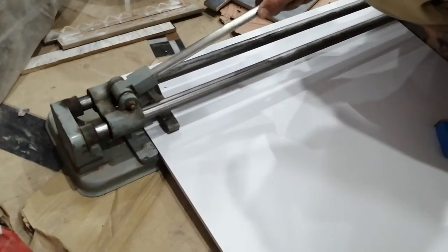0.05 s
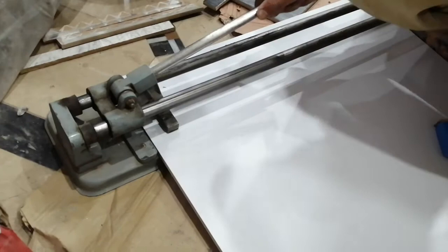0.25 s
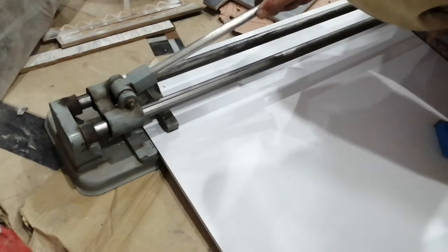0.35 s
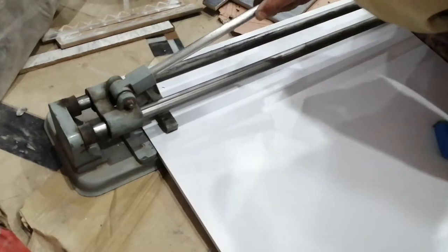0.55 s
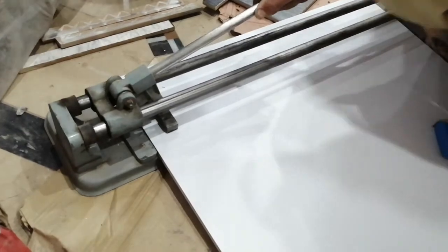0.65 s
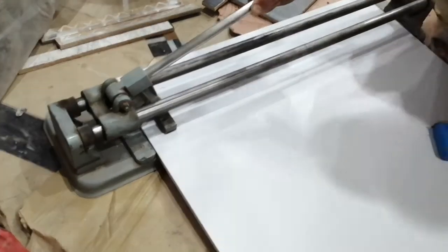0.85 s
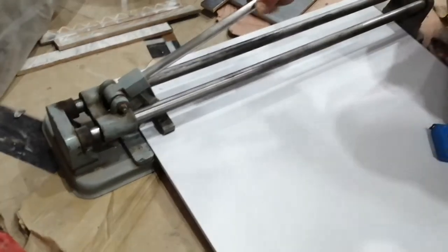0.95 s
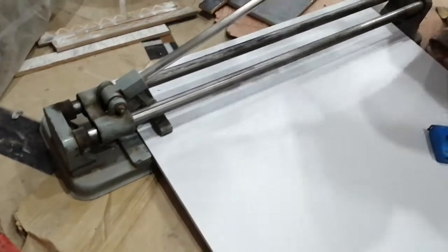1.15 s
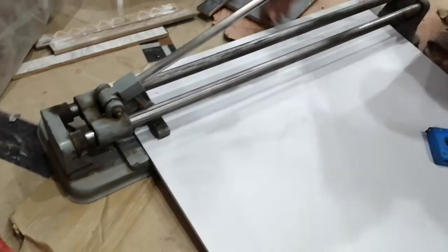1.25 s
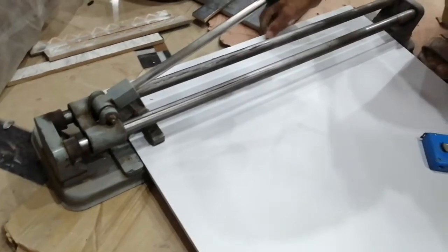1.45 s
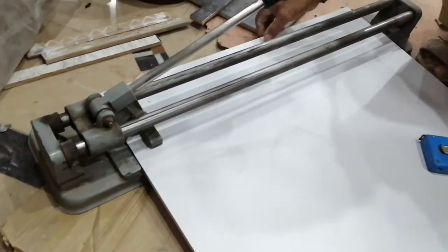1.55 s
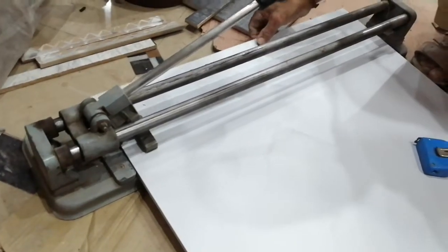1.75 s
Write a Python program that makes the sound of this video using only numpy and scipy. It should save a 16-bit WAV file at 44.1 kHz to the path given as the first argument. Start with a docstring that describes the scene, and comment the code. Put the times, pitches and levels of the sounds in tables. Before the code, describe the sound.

A manual tile cutter clacks hard, rumbles and grates in short slips over ceramic tile, knocks to a stop, then a metal piece rattles farther off and faint scraping returns; small hard room, close phone microphone.

```python
"""A workbench in a small hard room: a hand tile cutter close to a phone with two unlike microphones.
The carriage clacks, rumbles and grates along steel rails over a ceramic tile, catching in short slips:
shaped noise and short pushes ring the tile, rails and cast frame. Farther off a metal piece rattles,
a set of wavering sine modes. Under it lie filtered-noise hiss, lone bright clicks and a faint regular triple tick."""
import sys
import numpy as np
from scipy import signal
from scipy.fft import rfft, irfft, next_fast_len
from scipy.io import wavfile
from scipy.ndimage import uniform_filter1d, map_coordinates

SR = 44100
rng = np.random.default_rng(int(sys.argv[2]) if len(sys.argv) > 2 else 0)


def wav_record(signal):
    """Record a signal, one row per channel, as 16-bit PCM in the file named by sys.argv[1]."""
    frames = np.transpose(np.atleast_2d(signal))
    bounded = np.clip(frames, -1, 1)
    # unit amplitude maps onto the largest positive 16-bit level
    quanta = np.round(bounded * 32767).astype(np.int16)
    wavfile.write(sys.argv[1], SR, quanta)


def natural_amplitude(level_db):
    """Convert a level in decibels to a linear amplitude factor, elementwise."""
    exponent = np.asarray(level_db, float) / 20
    return 10 ** exponent


N = 79380
T = np.arange(N) / SR


def unit(x):
    """Scaled to rms 1."""
    return x / np.sqrt(np.mean(x ** 2) + 1e-20)


def along(points, hz):
    """Interpolates (frequency [Hz], value) points on a log frequency axis."""
    f, v = np.transpose(points)
    return np.interp(np.log(hz + 1), np.log(f + 1), v)


def filtered(x, response):
    """Multiplies the spectrum of x by a complex response of frequency."""
    size = 2 * next_fast_len(N // 2 + SR // 2)
    spectrum = rfft(x, size) * response(np.fft.rfftfreq(size, 1 / SR))
    return irfft(spectrum, size)[..., :N]


def causal(points):
    """Minimum-phase response of unit mean power through (frequency [Hz], level [dB]) points."""
    def response(hz):
        cepstrum = irfft(np.log(natural_amplitude(along(points, hz)) + 1e-6))
        # folding the cepstrum forward in time gives minimum phase
        cepstrum[1:len(cepstrum) // 2] *= 2
        cepstrum[len(cepstrum) // 2 + 1:] = 0
        h = np.exp(rfft(cepstrum))
        return h / np.sqrt(np.mean(abs(h) ** 2))
    return response


def resonant(peaks):
    """Sum of resonances (frequency [Hz], width [Hz], level [dB]), alternating in sign, of unit mean power."""
    def response(f):
        h = 0
        for k, (center, width, db) in enumerate(peaks):
            loss = 1j * f * width
            h = h + (-1) ** k * natural_amplitude(db) * loss / (center * center - f * f + loss)
        return h / np.sqrt(np.mean(abs(h) ** 2))
    return response


def widths(modes):
    """Turns modes (frequency [Hz], level [dB], t60 [s]) into resonances: a longer ring is narrower."""
    return [(hz, np.log(1000) / (np.pi * t60), db) for hz, db, t60 in modes]


def wobble(rate):
    """Smooth random curve with this many knots a second."""
    knots = rng.standard_normal(int(N * rate / SR) + 4)
    return map_coordinates(knots, [T * rate])


def burst(s, db, t60, attack):
    """Envelope of one hit: exponential rise and decay."""
    u = np.maximum(T - s, 0)
    return natural_amplitude(db - 60 * u / t60) * (1 - np.exp(-u / attack))


def pan(db):
    """Left and right gains for a balance of left over right [dB]."""
    return natural_amplitude(np.array([[db / 2], [-db / 2]]))


def noise():
    """Excitation as it reaches the two microphones: two noises, partly alike."""
    shared = 0.21  # share of the left noise in the right
    left, other = rng.standard_normal((2, N))
    return np.array([left, shared * left + np.sqrt(1 - shared ** 2) * other])


def ports(points):
    """Two microphones' gains with this left-over-right balance and a constant summed power."""
    def response(hz):
        turn = np.arctan(natural_amplitude(-along(points, hz)))
        return 2 * np.array([np.cos(turn), np.sin(turn)])
    return response


# color of the room and circuit noise: (frequency [Hz], relative level [dB])
HISS_COLOR = [(15, -15), (25, 6), (141, -6), (270, -0.5), (335, -4.5), (641, -10), (1610, -14.5),
              (1740, -13.5), (3620, -16.5), (5570, -3.5), (6380, -12.5), (12200, -18.5), (16000, -29)]
# how alike it is at the two microphones, before the balance: (frequency [Hz], likeness [-1 to 1])
HISS_ALIKE = [(60, 0.18), (180, 0.32), (550, 1), (1650, 0.24), (4970, 0.19), (15000, -0.04)]
# its balance between them: (frequency [Hz], left over right [dB])
HISS_BALANCE = [(60, 8), (110, 4), (200, 10), (380, 4), (700, 7.5), (1290, 2.0), (2380, 2.5), (4400, -9.5),
                (8120, 7), (15000, 18.5)]
HISS_DB = -65.5


def hiss():
    """Room and circuit noise: colored noise, slightly unsteady in level."""
    def middle_and_side(hz):
        turn = np.arccos(np.clip(along(HISS_ALIKE, hz), -1, 1)) / 2
        return natural_amplitude(along(HISS_COLOR, hz)) * [np.cos(turn), np.sin(turn)]
    middle, side = filtered(rng.standard_normal((2, N)), middle_and_side)
    both = filtered(np.array([middle + side, middle - side]), ports(HISS_BALANCE))
    return both * natural_amplitude(HISS_DB + 0.76 * wobble(8.75)) / np.std(both.mean(axis=0))


# color of the tick: (frequency [Hz], relative level [dB])
TICK_COLOR = [(5000, -75), (8500, -5), (12000, -12), (15500, -13.5)]
# the three clicks of one tick: (time after the first [s]) and (level [dB])
TICK_GAPS = [0, .006, .0102]
TICK_DB = [-55, -61.5, -55]
TICK_S, TICK_PERIOD_S = 0.078, 0.08


def ticks():
    """Three tiny clicks, repeated evenly: decaying bursts of bright noise."""
    push = 0
    # the first tick starts just before the sound does
    for s in np.arange(TICK_S - TICK_PERIOD_S, N / SR, TICK_PERIOD_S):
        for gap, db in zip(TICK_GAPS, TICK_DB):
            push = push + burst(s + gap, db, t60=0.0065, attack=0.00018)
    return filtered(push * rng.standard_normal((2, N)), causal(TICK_COLOR))


# lone bright clicks: (time [s], relative level [dB], t60 [s])
CLICKS = [(0.0034, -44.5, 0.015), (0.0174, -42, 0.02), (0.0398, -45.5, 0.014), (0.0444, -54, 0.015),
          (1.2984, -56, 0.005), (1.3224, -50, 0.015), (1.4027, -44, 0.02), (1.4436, -45.5, 0.019)]
# their color: (frequency [Hz], relative level [dB])
CLICK_COLOR = [(1760, -57), (3000, -28), (4830, -11.5), (5440, -4.5), (7830, -19), (8640, -3.5),
               (16000, -16.5)]


def clicks():
    """Lone bright clicks: short decaying noise."""
    push = sum(burst(s, db - 6, t60, attack=0.0004) for s, db, t60 in CLICKS)
    return filtered(noise() * push, causal(CLICK_COLOR))


# strokes of the carriage, a list each; the fourth is the dying tail of the knock at 1.1 s:
# (time [s], relative levels of grating, rolling, deep rumble [dB])
STROKES = [
    [(0.1, -73, -81, -88), (0.11, -66.5, -75, -82), (0.136, -68, -97, -88), (0.15, -64.5, -81, -82),
     (0.158, -63, -95, -76), (0.174, -64, -91, -99), (0.198, -67.5, -100, -78), (0.218, -60, -96, -82)],
    [(0.27, -43, -41.5, -45), (0.294, -51.5, -43.5, -62), (0.362, -53.5, -44, -56),
     (0.424, -61.5, -49.5, -52.5), (0.502, -61.5, -51.5, -57), (0.522, -53, -52.5, -58.5),
     (0.558, -55.5, -47.5, -62), (0.57, -39, -34, -65), (0.592, -48.5, -45, -69), (0.616, -42.5, -49, -62),
     (0.622, -41.5, -43, -64), (0.654, -45, -41, -65), (0.682, -39.5, -45, -68), (0.713, -44.5, -64, -59)],
    [(0.744, -32, -47, -89), (0.762, -37.5, -48, -78), (0.776, -38.5, -54, -97), (0.794, -31.5, -44, -93),
     (0.808, -29.5, -60, -85), (0.83, -32.5, -76, -67), (0.85, -41, -61, -75), (0.864, -35.5, -47, -59),
     (0.898, -42.5, -41, -74), (0.94, -43.5, -48.5, -90), (0.964, -51, -51, -87), (0.972, -44, -52, -78),
     (1.074, -78, -70, -76), (1.085, -75, -75, -80)],
    [(1.12, -47.5, -48.5, -71), (1.148, -68, -56.5, -72), (1.2, -93, -72, -86), (1.232, -82, -82, -73),
     (1.3, -83, -104, -80)],
    [(1.66, -51, -52, -86), (1.664, -68, -68, -83), (1.674, -47.5, -60, -87), (1.688, -54.5, -58, -76),
     (1.7, -44, -47, -87), (1.734, -57.5, -53, -83), (1.758, -78, -63, -87), (1.766, -48.5, -67, -91),
     (1.776, -44.5, -79, -68), (1.79, -43, -44, -73)],
]
# the place of each list: (left over right [dB])
STROKE_PAN_DB = [-6.5, 1, -1, 2, -7]


def stroke(column, shares=(1, 1, 1, 1, 1)):
    """Left and right gain of one column over all strokes and the knock's tail; the last runs on to the end."""
    gain = 0
    for k, points in enumerate(STROKES):
        times, levels = np.array(points)[:, 0], np.array(points)[:, column]
        after = None if k == len(STROKES) - 1 else -140
        level = np.interp(T, times, levels, left=-140, right=after)
        gain = gain + shares[k] * pan(STROKE_PAN_DB[k]) * natural_amplitude(level)
    return gain


# sudden catches of the wheel on grit: (time [s], relative level [dB], t60 [s], attack [s])
SLIPS = [(0.1805, -50, 0.041, 0.001), (0.192, -43.5, 0.041, 0.00081), (0.517, -48, 0.031, 0.001),
         (0.5285, -35.5, 0.032, 0.001), (0.549, -27.5, 0.061, 0.001), (0.62, -34, 0.033, 0.001),
         (0.7178, -22.5, 0.057, 0.00072), (0.732, -19.5, 0.051, 0.00061), (0.7428, -23.5, 0.055, 0.00079),
         (0.7948, -22.5, 0.055, 0.00089), (0.9705, -50, 0.05, 0.001), (1.6548, -50, 0.04, 0.0007),
         (1.6696, -49, 0.05, 0.00072), (1.695, -40, 0.042, 0.001), (1.71, -50, 0.05, 0.001),
         (1.774, -43, 0.031, 0.001), (1.7904, -35, 0.073, 0.0011)]
# blows: (time [s], relative levels of thud in the frame, knock in the tile, crack [dB])
BLOWS = [(0.2333, -14, -32, -13.5), (0.2359, -15.5, -28, -38.5), (0.2391, -14.5, -24, -42),
         (0.2494, -32, -30, -51), (0.2595, -57, -24, -38.5), (0.566, -28, -31, -37.5),
         (0.578, -36, -32, -60), (0.745, -32.5, -45, -60), (0.796, -68, -21, -71), (1.094, -28.5, -70, -61),
         (1.101, -25.5, -48, -39.5), (1.106, -58, -24, -46.5), (1.145, -54, -66, -67),
         (1.67, -72, -31.5, -51), (1.699, -48.5, -30, -62), (1.71, -76, -61, -60)]
# broad color of the grating: (frequency [Hz], relative level [dB])
GRATING_COLOR = [(350, -37), (600, -12), (698, -2.5), (1190, -13), (1490, -20.5), (1700, -7.5),
                 (3250, -1.5), (3680, -6.5), (8990, -2.5), (15100, -15), (16000, -34.5)]
# resonances of tile and rails: (frequency [Hz], width [Hz], relative level [dB])
TILE = [(709, 90, -4.5), (783, 69, -5.5), (1203, 55, -12), (1770, 220, -6), (2040, 56, -16), (2476, 30, 5),
        (3316, 35, 0), (4270, 110, -4), (5326, 320, 1), (6080, 91, 5), (6760, 23, -19.5), (7240, 440, 4.5),
        (8600, 54, 2), (9630, 81, 0.5), (9510, 70, -1), (12740, 33, -46)]
# share of the rolling in each list that sounds in the tile, the rest in the frame: (share [0 to 1])
ON_TILE = [0.04, .3, 0.8, 0.19, 0.82]
GRIT_PER_S, GRIT_SPREAD_DB, GRIT_DB = 2500, 2.5, -9  # grains: rate, spread of sizes, level against the noise
TILE_DB, KNOCK_HZ = -2.5, 1000  # resonances over the broad grating; a knock is dull above this


def grating():
    """Grit grains on noise under the stroke and its slips, and knocks, through tile and rails."""
    size = natural_amplitude(GRIT_SPREAD_DB * np.minimum(rng.exponential(size=N), 3))
    grit = (rng.random(N) < GRIT_PER_S / SR) * size
    rub = unit(noise() * (1 + natural_amplitude(GRIT_DB) * unit(grit)))
    push = stroke(column=1) * natural_amplitude(1.2 * wobble(120))
    push = push + sum(burst(s, db - 9, t60, attack) for s, db, t60, attack in SLIPS)

    rolling = stroke(column=2, shares=ON_TILE) * natural_amplitude(15 + 2.3 * wobble(74))
    hits = sum(burst(s, db, t60=0.033, attack=0.0007) for s, _, db, _ in BLOWS)
    knock = noise() * (rolling + hits)

    broad, tile = causal(GRATING_COLOR), resonant(TILE)

    def rubbed(hz):
        return (broad(hz) + natural_amplitude(TILE_DB) * tile(hz)) / np.hypot(1, natural_amplitude(TILE_DB))

    def knocked(hz):
        return tile(hz) / (1 + 1j * hz / KNOCK_HZ) ** 2
    return filtered(rub * push, rubbed) + filtered(knock, knocked)


# modes of the cast frame on the bench: (frequency [Hz], relative level [dB], t60 [s])
BENCH = [(179.5, -10.5, 0.22), (214.6, -5.5, .14), (273.3, -5.5, 0.075), (304.1, -4.5, 0.13),
         (368, -10.5, 0.065), (444, -7, 0.079), (525.5, 2.5, 0.068), (563, 4.5, .07), (649, -1, 0.057),
         (802, -8.5, 0.033), (242, -9, 0.1), (875, -9, 0.065)]
# color of the deep bench rumble: (frequency [Hz], relative level [dB])
DEEP_COLOR = [(15, -55), (25, -35), (65, -11), (146, -7.5), (177, 0), (216, -8.5), (260, -18.5), (340, -36),
              (570, -120)]
FRAME_PAN_DB = -5  # left over right


def bench():
    """Rolling and the short push of each blow ring the frame; the bench rumbles below."""
    roll = stroke(column=2, shares=1 - np.array(ON_TILE)) * natural_amplitude(2.36 * wobble(60))
    thud = sum(burst(s, db + 0.5, t60=0.0017, attack=0.0001) for s, db, _, _ in BLOWS)
    frame = filtered(noise() * roll + thud, resonant(widths(BENCH)))
    deep = unit(filtered(noise(), causal(DEEP_COLOR))) * stroke(column=3) * natural_amplitude(2.0 * wobble(23.45))
    return pan(FRAME_PAN_DB) * (frame + deep)


# upper modes of the frame: (frequency [Hz], relative level [dB], t60 [s])
UPPER = [(1016, -2, 0.044), (1187, 2, 0.041), (1333, -6, 0.041), (1647.6, -3.5, 0.055), (2073, -10, 0.035)]
UPPER_BLOW_DB, UPPER_ROLL_DB = -8, -12  # against the crack and the grating
CRACK_T60 = 0.092  # s


def upper():
    """Hard contact, in grating and blows, rings the upper modes of the frame."""
    push = natural_amplitude(UPPER_ROLL_DB) * stroke(column=1)
    push = push + sum(burst(s, db + UPPER_BLOW_DB, CRACK_T60, attack=0.0019) for s, _, _, db in BLOWS)
    return filtered(noise() * push, resonant(widths(UPPER)))


# color of steel on steel: (frequency [Hz], relative level [dB])
CRACK_COLOR = [(880, -18.5), (1500, -15), (1660, -8.5), (3250, -5), (3620, -15.5), (5660, -1.5),
               (6960, -16), (9850, -13.5), (14500, -27), (16000, -48)]
CRACK_PAN_DB = -2.5  # left over right
SNAP_T60, SNAP_DB = 0.01, 6  # s; dB


def cracks():
    """The bright contact of steel on steel in each blow: a snap and a short hiss."""
    push = 0
    for s, _, _, db in BLOWS:
        push = push + burst(s, db - 8.5, CRACK_T60, attack=0.00028)
        push = push + burst(s, db - 10.5 + SNAP_DB, SNAP_T60, attack=0.00027)
    return pan(CRACK_PAN_DB) * filtered(noise() * push, causal(CRACK_COLOR))


# modes of the far metal piece: (frequency [Hz], relative level [dB], start time [s], swell [s], t60 [s])
PIECE = [(690, -55, 1.355, 0.011, 0.33), (752, -54, 1.343, .015, 0.63), (956, -55.5, 1.2, 0.0067, 0.57),
         (1142, -54, 1.35, 0.021, 0.2), (1300, -55.5, 1.35, 0.018, 0.57), (1538, -52.5, 1.357, 0.022, 0.44),
         (1728, -54, 1.336, 0.0071, 0.41), (2010, -61, 1.1, 0.011, 0.54), (2344, -62, 1.34, 0.011, 0.36),
         (2670, -64, 1.337, .003, .15), (3050, -61, 1.345, 0.0092, 0.32), (3175, -54, 1.336, 0.00075, 0.31),
         (3130, -61, 1.2, .015, 0.34), (3910, -66, 1.34, 0.0085, 0.18), (4300, -60, 1.336, .002, 0.056)]
PIECE_PAN_DB = -4  # left over right
DAMPED_S, DAMPED_T60 = 1.406, 0.083  # s: when it is stopped, and how fast it then dies
WAVER_DB, WAVER_RAD, GRAINY = 3.5, 0.7, 0.44  # unsteadiness of level, phase and fine grain
ECHO_S, ECHO_DB, ECHO_HZ = 0.09, -13, 2000  # a far wall returns it, duller


def piece():
    """The metal piece rings unsteadily, its modes swelling at their own times, until it is stopped."""
    ring = 0
    for hz, db, s, swell, t60 in PIECE:
        waver = WAVER_DB * np.array([wobble(70), wobble(70)])  # apart at left and right
        tone = np.sin(2 * np.pi * hz * T + WAVER_RAD * wobble(90))
        ring = ring + burst(s, db + waver, t60, swell) * tone * (1 + GRAINY * wobble(500))
    ring = ring * natural_amplitude(-60 * np.maximum(T - DAMPED_S, 0) / DAMPED_T60)

    def with_echo(f):
        delay = np.exp(-2j * np.pi * f * ECHO_S)
        return 1 + natural_amplitude(ECHO_DB) * delay / (1 + 1j * f / ECHO_HZ) ** 2
    return pan(PIECE_PAN_DB) * filtered(ring, with_echo)


# decay of the small room: (frequency [Hz], t60 [s])
ROOM_DECAY = [(150, 0.51), (800, 0.62), (3000, 0.71), (10000, 0.16)]
ROOM_DB = -12
SPLIT_HZ, LEAD_S = 610, 0.0004024  # above this the microphones differ; the right one is nearer


def room(x):
    """Bass reaches both microphones alike, treble by different paths; then a tail that dies by frequency."""
    def low(hz):
        return 1 / (1 + (hz / SPLIT_HZ) ** 4)

    def early_high(hz):
        return (1 - low(hz)) * np.exp(2j * np.pi * hz * LEAD_S)
    left_power, right_power = [uniform_filter1d(side ** 2, size=2048) for side in x]
    balance = np.sqrt(right_power / (left_power + 1e-14) + 1e-9)
    right = filtered(x[0], low) * np.clip(balance, 0.3, 3) + filtered(x[1], early_high)

    hz, u, z = signal.stft(rng.standard_normal((2, SR * 3 // 4)), SR, nperseg=256)
    decay = natural_amplitude(-60 * u / along(ROOM_DECAY, hz)[:, None])
    tail = signal.istft(z * decay, SR, nperseg=256)[1]
    late = np.pad(x, ((0, 0), (250, 0)))  # the tail sets in 250 samples after the direct sound
    wet = signal.fftconvolve(late, tail / np.linalg.norm(tail[0]), axes=1)[:, :N]
    return np.array([x[0], right]) + natural_amplitude(ROOM_DB) * wet


# balance of the two microphones: (frequency [Hz], left over right [dB])
PORTS = [(60, -10), (80, 10), (110, 9), (140, 8.0), (190, 14), (260, 10), (340, 14.5), (460, 6.5),
         (610, 17.5), (820, 14), (1100, 12.5), (1470, 10), (1960, 9), (2620, 12), (3510, 11), (4690, -3),
         (6270, -7), (8390, 21.5), (11200, 13.5), (15000, -0.5)]
PIECE_WET_DB = -10.5  # the metal piece's share sent to the room


def scene():
    """All sources at the two unlike microphones, the near ones through the room, over the hiss."""
    metal = piece()
    close = grating() + bench() + upper() + cracks() + clicks()
    mixed = room(close + natural_amplitude(PIECE_WET_DB) * metal) + metal + ticks()
    return filtered(mixed, ports(PORTS)) + hiss()


def top_cut(x):
    """Nothing passes above the cut-off."""
    return signal.sosfilt(signal.butter(12, 16500, fs=SR, output="sos"), x)


def record(dry):
    """The phone's low cut: two first-order high-passes at 27 Hz."""
    mix = filtered(dry, lambda hz: (1j * hz / (27 + 1j * hz)) ** 2)
    return top_cut(mix)


dry = scene()
out = record(dry)
wav_record(out)
```